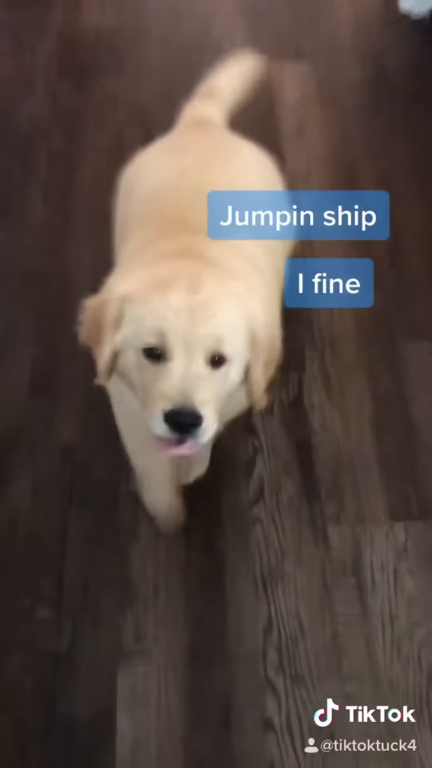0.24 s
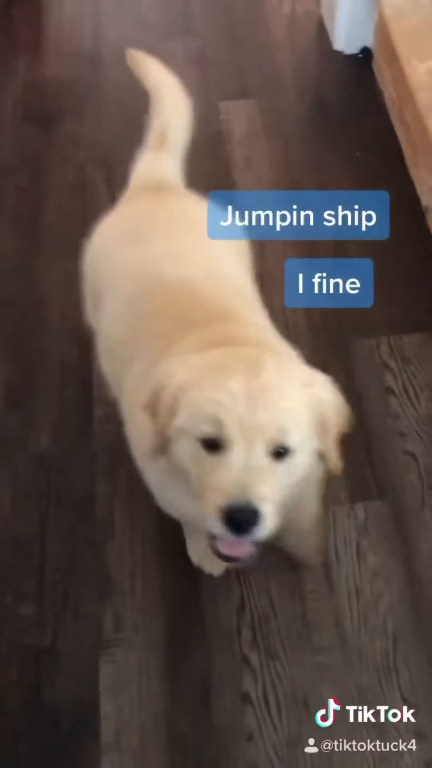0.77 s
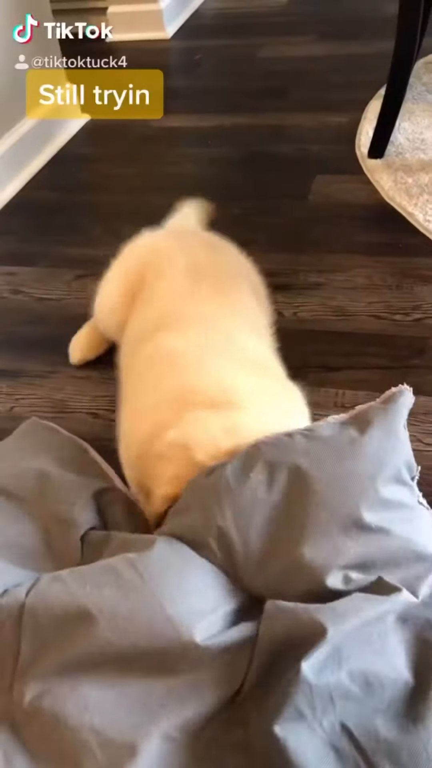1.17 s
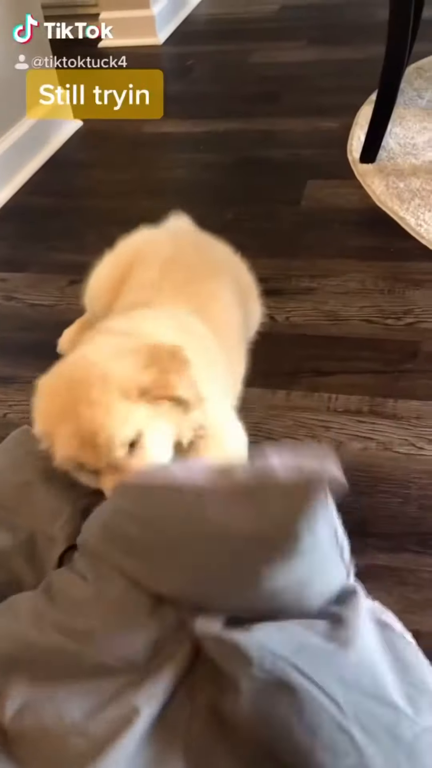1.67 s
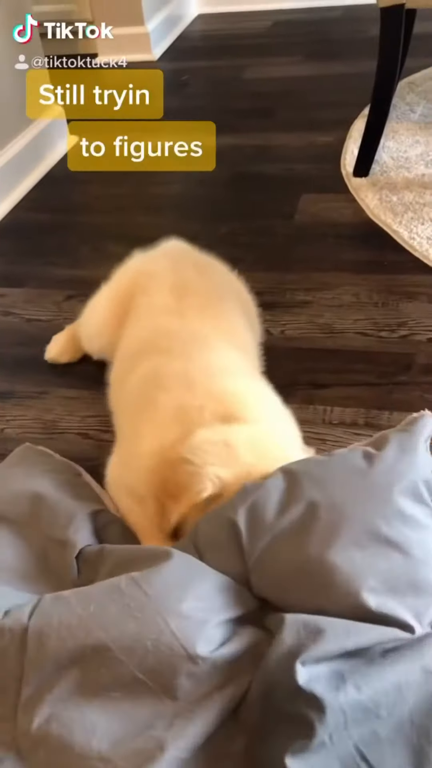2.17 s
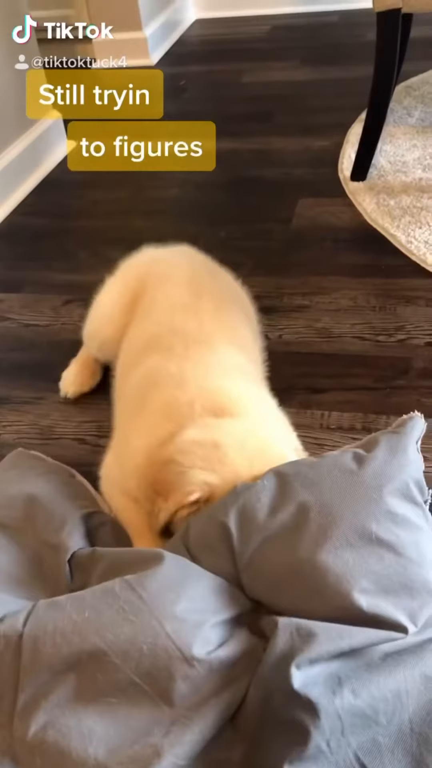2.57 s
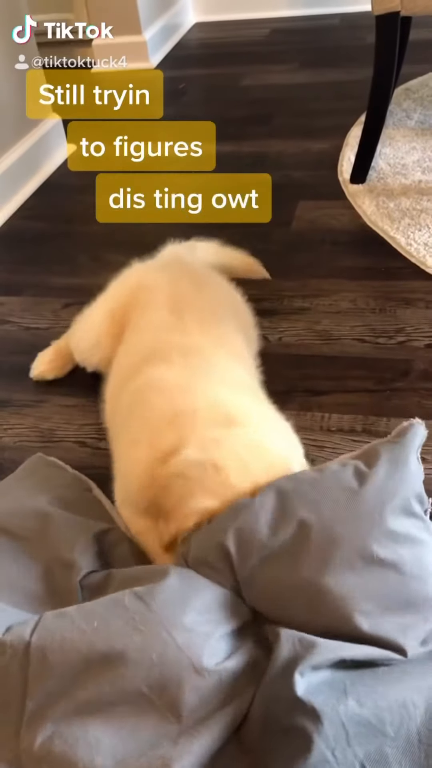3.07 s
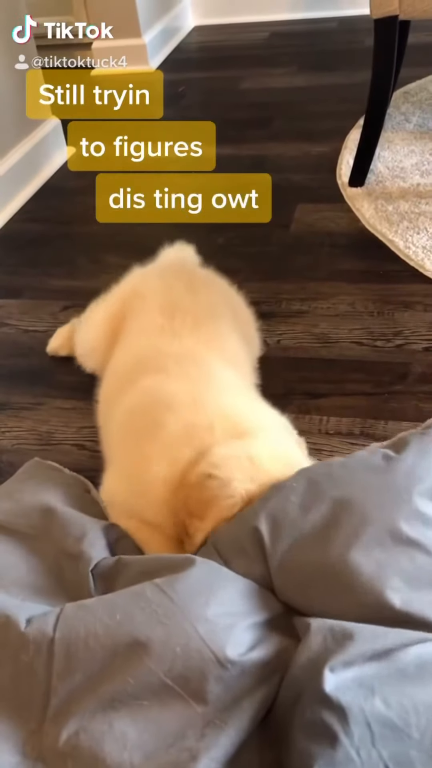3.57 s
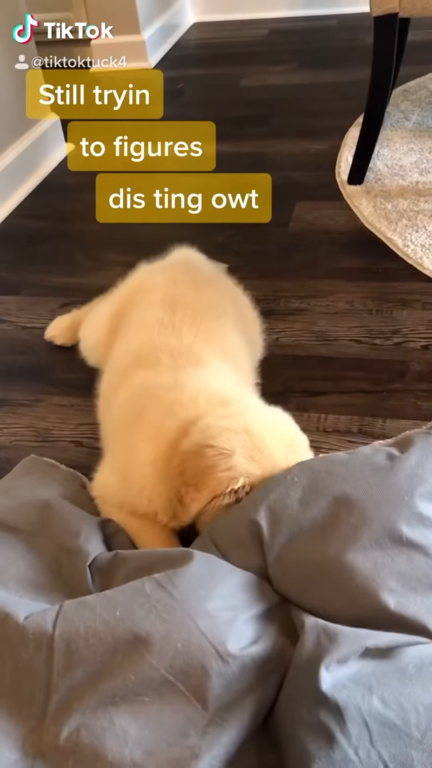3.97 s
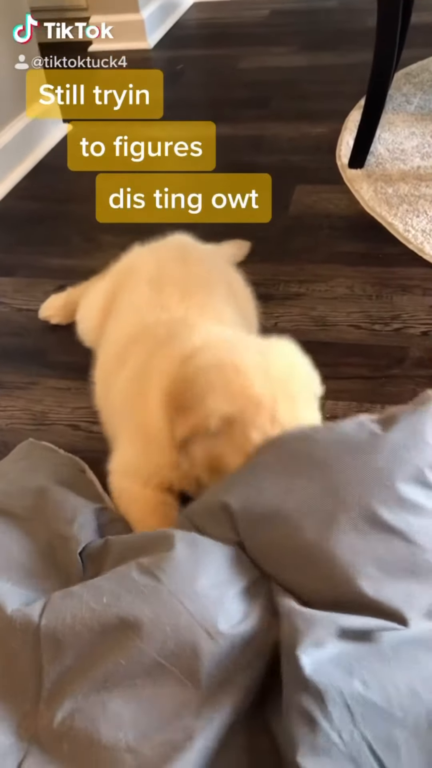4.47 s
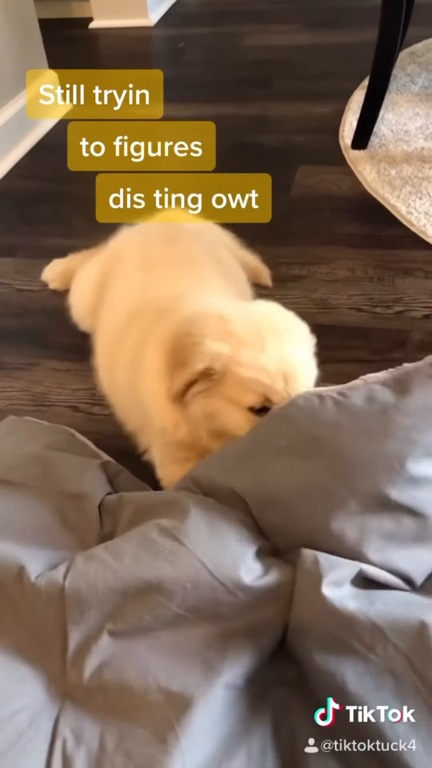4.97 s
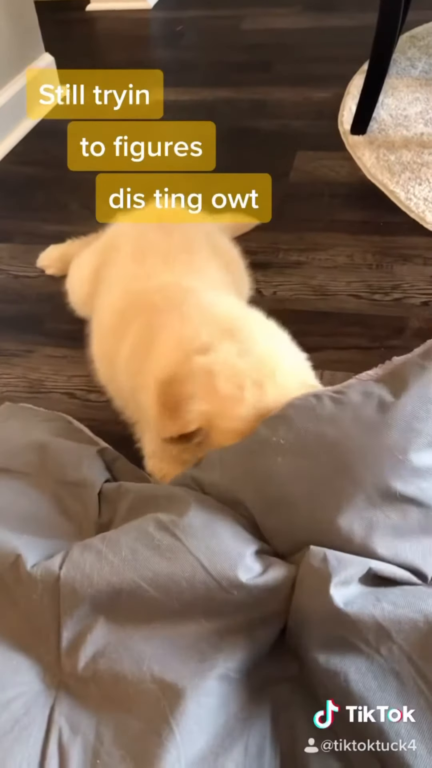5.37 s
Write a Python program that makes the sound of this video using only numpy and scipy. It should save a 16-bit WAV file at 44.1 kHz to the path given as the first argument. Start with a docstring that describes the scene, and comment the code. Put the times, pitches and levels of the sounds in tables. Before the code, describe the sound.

A puppy's paws clack loudly on a wooden floor, then silence cuts in, followed by quiet cloth rustling and soft irregular paw thumps.

```python
"""In a small room with a wooden floor, a puppy trots; after a short silence it burrows in a duvet.
Paws and claws strike the boards, whose bending waves turn each knock into a tiny falling chirp.
Cloth sliding on cloth and fur swishes through countless thread slips; taut weave zips as it is tugged.
Dense reflections follow, over a low rumble, a faint whir behind the trot and a faint hum behind the burrowing.
Both channels are alike."""
import sys
import numpy as np
from scipy import signal
from scipy.fft import rfft, irfft
from scipy.io import wavfile
from scipy.ndimage import uniform_filter1d, map_coordinates

SR = 44100
rng = np.random.default_rng(int(sys.argv[2]) if len(sys.argv) > 2 else 0)


def materialize(psi):
    """Save the field psi as 16-bit PCM at rate SR to the path in sys.argv[1].

    A 1-D psi becomes a single channel; in a 2-D psi each row is a channel.
    """
    bounded = np.clip(np.atleast_2d(psi).T, -1, 1)
    quanta = np.round(bounded * 32767).astype(np.int16)
    wavfile.write(sys.argv[1], SR, quanta)


N = 247842
TIME = np.arange(N) / SR

# Paw landings of the trot, levels before the offsets given to paws():
# (time [s], knock level [dB], claw tick relative to knock [dB], skid duration [s])
TROT_STEPS = [(.001, -29.5, -17.5, .06), (.3305, -28.5, 4, 0), (.3515, -11.5, -4, 0), (.355, -16, -7.5, 0),
              (.373, -22, -15.5, .014), (.3825, -23, -18, .032)]
# Paws and claws on the boards while burrowing, levels before the offsets given to paws():
# (time [s], knock level [dB], claw tick relative to knock [dB], skid duration [s])
PAWING = [(1.185, -52, 11.5, 0), (1.216, -45.5, 6, .018), (1.352, -51, -18, 0), (1.43, -51, -20, 0),
          (1.441, -48, -17, 0), (1.636, -51, -0.5, 0), (1.679, -46, -19, 0), (1.903, -38, -20, 0),
          (2.4, -36, -0.5, 0), (2.574, -26.5, -28, 0), (2.619, -22, -17.5, .014), (2.646, -26, -29, .045),
          (3.136, -37.5, 5.5, 0), (3.146, -38, -5, 0), (3.181, -37, -27, 0), (3.296, -51, -5, 0),
          (3.355, -42, -11, 0), (3.637, -32, -15, 0), (3.73, -37.5, -10, 0), (3.951, -31, -41, 0),
          (3.982, -32, -36, .012), (4.003, -34.5, -36, 0), (4.035, -25.5, -22.5, .012),
          (4.062, -24.5, -18, .014), (4.089, -27.5, -30, .013), (4.177, -45, -19, 0), (4.306, -50, -9, 0),
          (4.758, -43.5, -10, 0), (5.108, -45, 8, 0), (5.139, -35.5, -4, 0), (5.188, -44, -17, 0),
          (5.351, -32, -25, 0), (5.444, -28, -14, .022), (5.495, -45, -16, 0), (5.518, -48.5, 5, 0)]
# Pads and fur brushing the floor:
# (crest time [s], length [s], level [dB], low body relative to level [dB], top sheen relative to level [dB])
FLOOR_SCUFFS = [(.005, 0.12, -48, 18, -15), (.168, .11, -47.5, -5, 0), (.344, 0.033, -35.5, -16, -5),
                (.395, 0.15, -46.5, 12.5, -18), (.675, 0.085, -44, -0.5, -28)]
# Strokes of muzzle and paws through the cloth:
# (crest time [s], length [s], level [dB], low body relative to level [dB], top sheen relative to level [dB])
CLOTH_STROKES = [(.96, 0.084, -59, 5, 2), (1.072, 0.093, -43.5, -4, -4.5), (1.11, 0.029, -48.5, 1.5, 6.5),
                 (1.21, 0.07, -56.5, 1.5, 3), (1.44, .05, -71.5, 11, 7), (1.79, 0.28, -56.5, 2.5, -2.5),
                 (1.935, 0.07, -51, 8.5, 1.5), (2.139, .016, -46, -14, -3), (2.161, 0.025, -41, -5, 5),
                 (2.22, 0.23, -59.5, 3.5, 3.5), (2.283, 0.035, -44, -1.5, 5),
                 (2.322, 0.058, -43.5, 1.5, 4.5), (2.518, 0.083, -41.5, -1, 3.5),
                 (2.73, 0.33, -56, -0.5, 0), (3.04, 0.12, -44, -1, 3), (3.2, 0.039, -67, 14, 6),
                 (3.43, 0.18, -71.5, 17.5, -24), (3.62, 0.11, -60, 7.5, 1.5), (3.71, 0.17, -62, 4, 2),
                 (4.49, 0.34, -62.5, 5, 2), (4.8, 0.088, -59, -6, -3.5), (5.06, .17, -64, 3, 2),
                 (5.245, 0.19, -54, 7, -4), (5.303, .07, -43.5, 7.5, -0.5)]
# Creases snapping over: (time [s], level [dB], top sheen relative to level [dB])
CREASE_SNAPS = [(1.033, -54, -5), (1.833, -43, -1), (1.907, -47.5, 6.5), (2.267, -47, -4),
                (2.349, -47, 10.5), (2.898, -49, 3.5), (3.208, -54.5, 6), (4.761, -61.5, 19)]
# Soft bumps of the body on the floor: (time [s], envelope peak [dB], pitch [Hz])
BODY_BUMPS = [(1.24, -49.5, 167), (1.678, -53, 267), (1.83, -51, 302), (2.685, -49, 248), (2.708, -46, 149),
              (4.306, -53.5, 290), (4.749, -48, 178)]
# Pads sliding on the boards: (crest time [s], half-width to 1/e [s], level [dB])
PAD_SLIDES = [(3.43, 0.041, -66), (5.21, 0.067, -56), (5.303, 0.036, -44.5), (5.457, 0.01, -41.5),
              (5.5, 0.019, -55.5)]
# Fits of the weave as the duvet is tugged upwards: (crest time [s], half-width to 1/e [s], level [dB])
WEAVE_TUGS = [(4.691, .005, -64), (4.73, 0.03, -61), (4.804, 0.022, -61.5), (4.845, 0.03, -68.5)]

# Knock spectrum of the open floor: (frequency [Hz], relative level [dB])
OPEN_BOARDS = [(40, -38.5), (70, -21.5), (120, -13), (300, -14), (450, -8.5), (580, -3), (750, 3),
               (850, -11), (960, 0), (1350, -5.5), (1550, -22.5), (2700, -13.5), (4500, -30.5), (9000, -41)]
# Knock spectrum of the boards by the duvet: (frequency [Hz], relative level [dB])
DUVET_BOARDS = [(60, -42), (110, -29), (220, -11), (400, -4.5), (560, -2), (700, 3.5), (900, -6.5),
                (1300, -9), (1750, -19.5), (3000, -29), (8000, -85)]
# Spectrum of a claw tick: (frequency [Hz], relative level [dB])
CLAW_SPECTRUM = [(400, -10), (1200, 6.5), (3500, 3.5), (5500, -2.5), (8000, -7), (15500, -22)]
# Spectrum of rubbing: (frequency [Hz], relative level [dB])
RUBBING_SPECTRUM = [(90, -31), (200, -18), (400, -5.5), (680, 2), (1000, -1), (1600, -1), (2100, -3.5),
                    (2800, -2), (4000, -5), (6200, -5.5), (8000, -6.5), (9200, -10), (15500, -16)]
# Background noise behind the trot: (frequency [Hz], relative level [dB])
TROT_ROOM = [(25, -27.5), (50, -3.5), (75, 4), (120, 2), (290, -5), (550, -4.5), (900, -8), (1150, -3),
             (1400, -12), (1600, -13.5), (3500, -19.5), (5500, -29), (9000, -36.5), (15500, -37.5)]
# Background noise behind the burrowing: (frequency [Hz], relative level [dB])
BED_ROOM = [(15, -23), (25, -16), (82, 3), (152, -5), (221, 0), (410, -9), (684, -18), (1140, -16),
            (1270, -20.5), (1530, -18), (2360, -25.5), (3170, -23.5), (6730, -28.5), (7910, -28.5),
            (15500, -32.5)]

SILENCE_START_S, SILENCE_END_S = .721, .953
LOW_PASS_UNTIL_S, LOW_PASS_HZ = 1.095, 6700
TOP_HZ = 15800
BED_ROOM_DB = -64
# A skidding pad catches again and again, each time a little weaker.
CATCH_S, CATCH_JITTER, CATCH_DB, CATCH_FADE_DB_PER_S = .0095, .15, -3, -120
# Light stray touches of the paws fall between the firm ones.
TOUCHES_PER_S, TOUCH_DB, TOUCH_SPREAD_DB, TOUCH_CLAW_DB = 5.7, -51.5, 2.5, -10
# A stroke swells for this share of its length and dies away over the rest.
STROKE_RISE = 0.48
# Gentle strokes creep in (power 2); firmer ones break free abruptly and hold their speed.
GENTLE_DB, ABRUPT_POWER_PER_DB, RELEASE_POWER = -52.5, 0.34, 1.11
SNAP_S, SNAP_BODY_DB = 0.0067, 2
# After each pawing contact the paw drags dully on the cloth; DRAG_DB is relative to the knock level.
DRAG_LAG_S, DRAG_S, DRAG_DB, DRAG_BODY_DB, DRAG_SHEEN_DB = .075, 0.16, -40, 7, -33
SLIDE_HZ, SLIDE_WIDTH_HZ = 580, 150
TUG_START_HZ, TUG_RISE_HZ_PER_S = 2960, 5000
WHIR_HZ, WHIR_WAVER, WHIR_DB = 1112, 0.039, -56
HUM_HZ, HUM_DB = 212.5, -72


def undb(db):
    """Amplitude ratio: 20 dB stand for a factor of ten."""
    return 10 ** (np.asarray(db) / 20)


def unit(x):
    """Power normalisation: scale to rms 1."""
    return x / np.sqrt(np.mean(x ** 2))


def response(points, hz):
    """Frequency response: gain interpolated in dB over log frequency."""
    f, db = np.transpose(points)
    return undb(np.interp(np.log(hz + 1), np.log(f), db))


def colour(x, points):
    """Linear filtering: multiply the spectrum of x by a response."""
    hz = np.fft.rfftfreq(len(x), 1 / SR)
    return irfft(rfft(x) * response(points, hz), len(x))


def split(x, hz):
    """Complementary bands: a zero-phase low-pass and its remainder."""
    low_pass = signal.butter(2, min(hz, SR / 3), fs=SR, output="sos")
    low = signal.sosfiltfilt(low_pass, x)
    return low, x - low


def walk(rate):
    """Band-limited chance: smoothed random levels near rms 1, redrawn `rate` times a second."""
    hold = max(int(SR / rate), 1)
    levels = np.repeat(rng.standard_normal(N // hold + 1), hold)
    return unit(uniform_filter1d(levels, hold)[:N])


def add(track, s, sound):
    """Superposition: mix a sound into the track at time s, trimmed to the ends."""
    start = int(s * SR)
    part = sound[max(-start, 0):N - start]
    track[max(start, 0):max(start, 0) + len(part)] += part


def skids(table):
    """Stick-slip: a landing, then fading catches of its skid, as (time [s], knock [dB], claw [dB])."""
    contacts = []
    for s, db, claw_db, skid_s in table:
        intervals = CATCH_S * np.exp(CATCH_JITTER * rng.standard_normal(size=10))
        lags = np.cumsum(intervals)
        contacts.append((s, db, claw_db))
        for lag in lags[lags < skid_s]:
            contacts.append((s + lag, db + CATCH_DB + CATCH_FADE_DB_PER_S * lag, claw_db))
    return contacts


def knock(boards, travel_s, rebound, size=2048):
    """Dispersion of bending waves: treble outruns bass, giving a falling chirp of a few ms."""
    hz = np.fft.rfftfreq(size, 1 / SR)
    centre_hz, fastest_hz = 600, 5000
    # group delay falls as one over the root of frequency, reaching zero at fastest_hz
    slowness = np.sqrt(centre_hz / (hz + 1)) - np.sqrt(centre_hz / fastest_hz)
    delay = travel_s * np.maximum(slowness, 0)
    phase = 2 * np.pi * np.cumsum(delay) * SR / size
    spot = np.exp(0.082 * rng.standard_normal())  # each spot of the floor has its own pitch
    # the wave comes back from the end of the board without its treble
    return_s = rng.uniform(0.0012, 0.002175)
    back = rebound * np.exp(-2j * np.pi * hz * return_s - (hz / 1500) ** 2)
    spectrum = response(boards, hz * spot) * np.exp(-1j * phase) * (1 + back)
    wave = np.roll(irfft(spectrum), size // 2)  # the contact lies at the middle sample
    return np.hanning(size) * wave / np.abs(wave).max()


def tick(decay_s, scratch=.45, size=1024):
    """Impact and abrasion: a claw's sharp touch and the brief scratch after it."""
    t = np.arange(size) / SR
    touch_s = .0003
    envelope = np.exp(-t / touch_s) + scratch * np.exp(-t / decay_s)
    burst = rng.choice([-1, 1], size) * envelope
    wave = colour(np.pad(burst, (size // 64, 0)), CLAW_SPECTRUM)
    return wave / np.abs(wave).max()


def paws(contacts, boards, travel_s, rebound, tick_s, knock_db, tick_db):
    """Impact excitation: each contact knocks on the boards and ticks with a claw."""
    out = np.zeros(N)
    for s, db, claw_db in contacts:
        wave = knock(boards, travel_s * np.exp(.15 * rng.standard_normal()), rebound)
        add(out, s - len(wave) / 2 / SR, undb(db + knock_db) * wave)
        add(out, s, undb(db + claw_db + tick_db) * tick(tick_s))
    return out


def folds(x, depth_db, rate, count=60, size=256):
    """Time-varying filtering: shifting folds favour now one narrow band, now another."""
    hz, s, spectra = signal.stft(x, SR, nperseg=size)
    # bands widen towards the treble
    place = np.meshgrid(np.sqrt(hz / hz[-1]) * count, s * rate, indexing="ij")
    chance = rng.standard_normal((count + 1, len(s)))
    gain = undb(depth_db * map_coordinates(chance, place, order=1, mode="mirror"))
    return signal.istft(spectra * gain, SR, nperseg=size)[1][:N]


def rubbing(table, slips_per_s, spread_db, hiss_db, catch_db, fold_db, body_hz, sheen_hz):
    """Dry friction: dense tiny slips catch unevenly while each stroke swells and dies away."""
    slipping = rng.random(N) < slips_per_s / SR
    slip_db = spread_db * np.minimum(rng.exponential(size=N), 3)
    slips = slipping * undb(slip_db) * rng.choice([-1, 1], N)
    friction = unit(slips) + undb(hiss_db) * rng.standard_normal(N)
    catching = friction * undb(catch_db * walk(220))
    rustle = unit(folds(colour(catching, RUBBING_SPECTRUM), fold_db, rate=35, count=44))
    # three registers, weighted anew by every stroke
    body, rest = split(rustle, body_hz)
    swish, sheen = split(rest, sheen_hz)
    t, power = TIME[::20], 0
    for s, length, db, body_db, sheen_db in table:
        rise, fall = STROKE_RISE * length, (1 - STROKE_RISE) * length
        gap = np.abs(t - s)
        onset_power = 2 + ABRUPT_POWER_PER_DB * max(db - GENTLE_DB, 0)
        fade = np.where(t < s, (gap / rise) ** onset_power, (gap / fall) ** RELEASE_POWER)
        speed = np.exp(-fade.clip(max=20))
        # pressing on the padding brings out the body, a light fast slide the sheen
        weights = undb(db + np.array([body_db, 0, sheen_db]))[:, None]
        power = power + (weights * speed) ** 2  # overlapping strokes add in power
    registers = zip(power, (body, swish, sheen))
    return sum(np.interp(TIME, t, np.sqrt(p)) * register for p, register in registers)


def room(x, wet_db, t60_low, t60_high, treble_db, gap_s):
    """Reverberation: dense reflections from walls and furniture decay, the treble first."""
    t = TIME[:SR]
    low, high = split(rng.standard_normal(SR), 3200)
    low_tail = low * np.exp(-np.log(1000) * t / t60_low)
    high_tail = undb(treble_db) * high * np.exp(-np.log(1000) * t / t60_high)
    # silent for gap_s, then fading in over another gap_s
    tail = (low_tail + high_tail) * np.clip(t / gap_s - 1, 0, 1)
    tail /= np.sqrt(SR * t60_low / (2 * np.log(1000)))
    return x + undb(wet_db) * signal.fftconvolve(x, tail)[:N]


def narrow_noise(hz, width_hz):
    """Quadrature modulation: slow noise on two carriers makes a noisy tone near rms 1."""
    phase = 2 * np.pi * np.cumsum(hz * np.ones(N)) / SR
    return walk(width_hz) * np.cos(phase) + walk(width_hz) * np.sin(phase)


def whir():
    """Frequency modulation: a faint noisy tone wavers in pitch."""
    return undb(WHIR_DB) * narrow_noise(WHIR_HZ * (1 + WHIR_WAVER * walk(5)), width_hz=25)


def background(points, db, waver_db):
    """Coloured noise: the rumble and hiss of the house, gently wavering in level."""
    return unit(colour(rng.standard_normal(N), points)) * undb(db + waver_db * walk(6))


def trotting():
    """Direct and reverberant sound: steps and scuffs on the open floor, over whir and rumble."""
    steps = paws(skids(TROT_STEPS), OPEN_BOARDS, travel_s=0.00277, rebound=0.12,
                 tick_s=0.00078, knock_db=0.0, tick_db=2.5)
    scuffs = rubbing(FLOOR_SCUFFS, slips_per_s=7700, spread_db=0.5, hiss_db=1.5, catch_db=1.0,
                     fold_db=4.5, body_hz=1500, sheen_hz=5620)
    sound = room(steps + scuffs, wet_db=-6.5, t60_low=0.63, t60_high=.5, treble_db=-1.0, gap_s=0.0072)
    return sound + whir() + background(TROT_ROOM, db=-48.5, waver_db=2.2)


def hum():
    """Narrow-band noise: an appliance hums faintly."""
    return undb(HUM_DB) * narrow_noise(HUM_HZ, width_hz=9)


def cloth_moves():
    """Friction events: strokes, snapping creases and the drag after each paw, as stroke rows."""
    snaps = [(s, SNAP_S, db, SNAP_BODY_DB, sheen_db) for s, db, sheen_db in CREASE_SNAPS]
    drags = [(s + DRAG_LAG_S, DRAG_S, db + DRAG_DB, DRAG_BODY_DB, DRAG_SHEEN_DB)
             for s, db, _, _ in PAWING]
    return CLOTH_STROKES + snaps + drags


def touches(count=40):
    """Poisson process: light contacts at random moments, as (time [s], knock [dB], claw [dB])."""
    times = SILENCE_END_S + np.cumsum(rng.exponential(1 / TOUCHES_PER_S, count))
    levels = TOUCH_DB + TOUCH_SPREAD_DB * rng.standard_normal(count)
    return [(s, db, TOUCH_CLAW_DB) for s, db in zip(times, levels) if s < TIME[-1]]


def bumps(swell_s):
    """Damped resonance: a padded push rings the floor for a few low cycles."""
    out, t = np.zeros(N), TIME[:SR // 4]
    envelope = t / swell_s * np.exp(1 - t / swell_s)
    for s, db, hz in BODY_BUMPS:
        add(out, s, undb(db) * envelope * np.sin(2 * np.pi * hz * t))
    return out


def swells(table):
    """Gaussian envelopes: smooth pushes, each rising and falling about its crest."""
    return sum(undb(db) * np.exp(-(((TIME - s) / length) ** 2).clip(max=20)) for s, length, db in table)


def slides():
    """Friction-driven resonance: a sliding pad keeps the boards humming."""
    return narrow_noise(SLIDE_HZ, SLIDE_WIDTH_HZ) * swells(PAD_SLIDES)


def tug(width_hz, flicker_db, hollow_hz, hollow_db):
    """Rib-passing frequency: the weave zips higher as the pull quickens; padding rasps lower down."""
    pull_s = np.clip(TIME - WEAVE_TUGS[0][0], 0, .5)
    ribs = narrow_noise(TUG_START_HZ + TUG_RISE_HZ_PER_S * pull_s, width_hz)
    padding = undb(hollow_db) * narrow_noise(hollow_hz, width_hz)
    return (ribs + padding) * undb(flicker_db * walk(70)) * swells(WEAVE_TUGS)


def burrowing():
    """Absorption: pawing and rooting in a duvet that soaks up much of the echo, over hum and rumble."""
    knocks = paws(skids(PAWING) + touches(), DUVET_BOARDS, travel_s=0.00447, rebound=0.97,
                  tick_s=0.0063, knock_db=-2.5, tick_db=-1.5)
    cloth = rubbing(cloth_moves(), slips_per_s=2600, spread_db=2.5, hiss_db=-2.5, catch_db=1.87,
                    fold_db=2.5, body_hz=1610, sheen_hz=5870)
    zipping = tug(width_hz=1050, flicker_db=2.0, hollow_hz=1263, hollow_db=-3.5)
    contacts = knocks + cloth + bumps(swell_s=0.0031) + slides() + zipping
    sound = room(contacts, wet_db=-5.5, t60_low=0.32, t60_high=0.26, treble_db=-3.5, gap_s=0.0049)
    return sound + background(BED_ROOM, db=BED_ROOM_DB, waver_db=1.83) + hum()


def scene():
    """Succession: the trot, a moment of silence, then the burrowing, low-passed until its top treble enters."""
    digging = burrowing()
    low_pass = signal.ellip(8, .1, 50, LOW_PASS_HZ, fs=SR, output="sos")
    without_treble = signal.sosfiltfilt(low_pass, digging)
    burrow = np.where(TIME < LOW_PASS_UNTIL_S, without_treble, digging)
    sound = trotting() * (TIME < SILENCE_START_S) + burrow * (TIME > SILENCE_END_S)
    return np.array([sound, sound])


def record(dry):
    """Band limiting: a steep low-pass removes the extreme treble."""
    return signal.sosfilt(signal.ellip(10, .2, 70, TOP_HZ, fs=SR, output="sos"), dry)


dry = scene()
out = record(dry)
materialize(out)
```